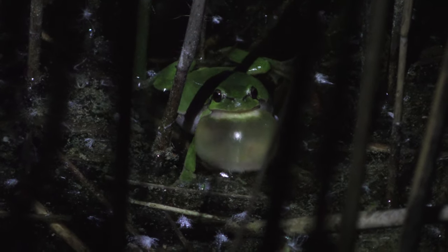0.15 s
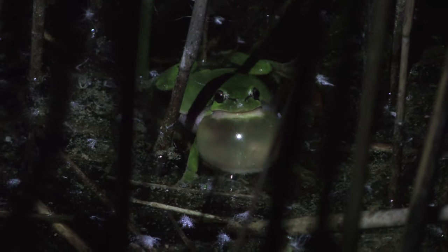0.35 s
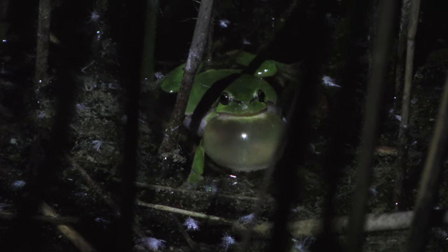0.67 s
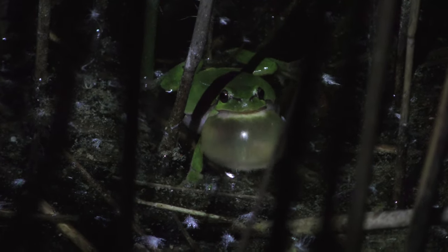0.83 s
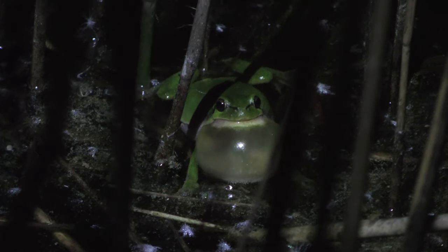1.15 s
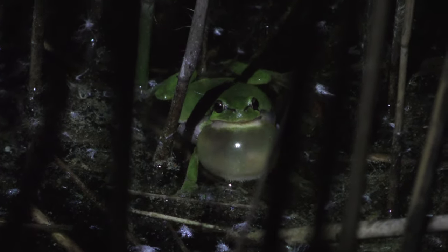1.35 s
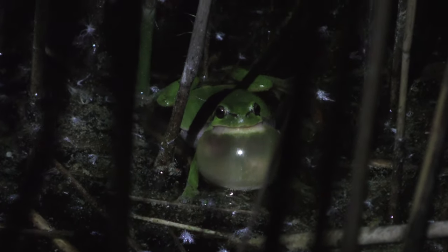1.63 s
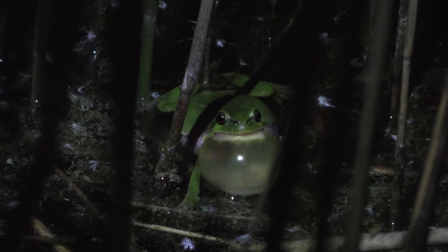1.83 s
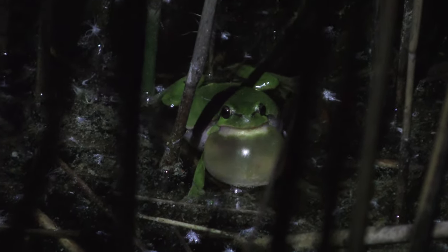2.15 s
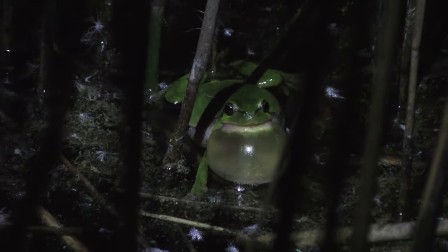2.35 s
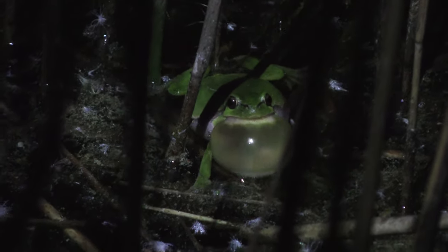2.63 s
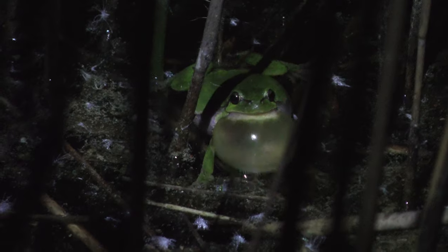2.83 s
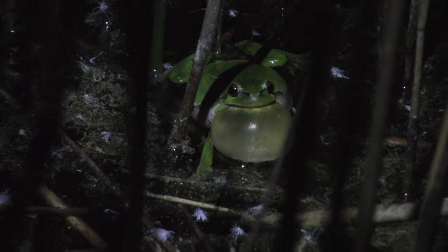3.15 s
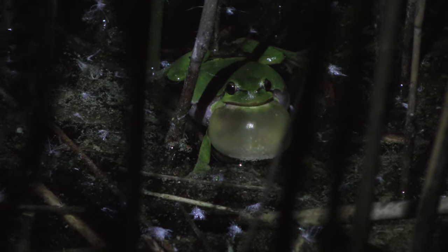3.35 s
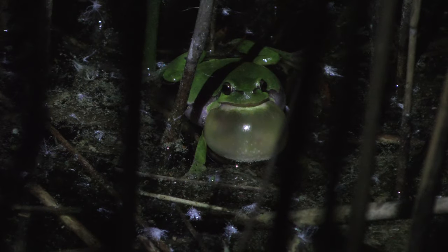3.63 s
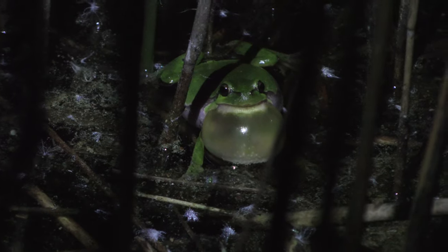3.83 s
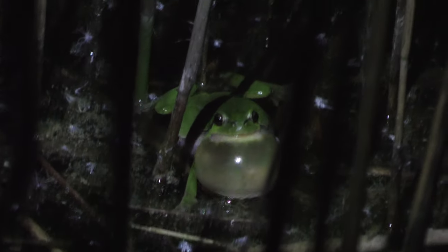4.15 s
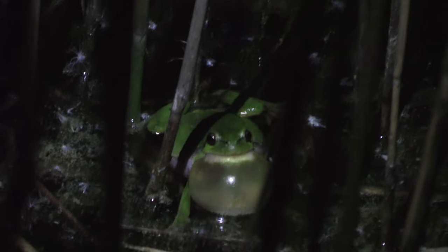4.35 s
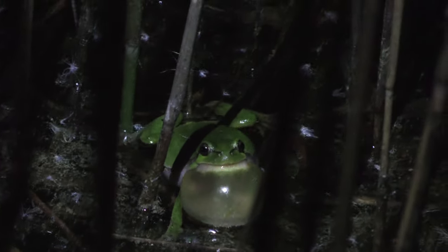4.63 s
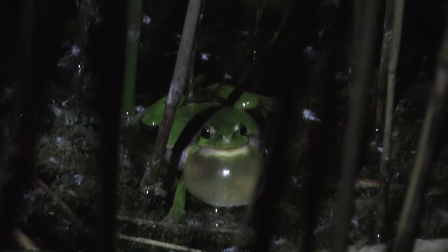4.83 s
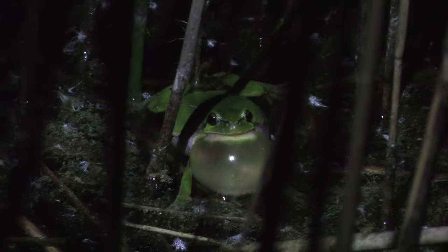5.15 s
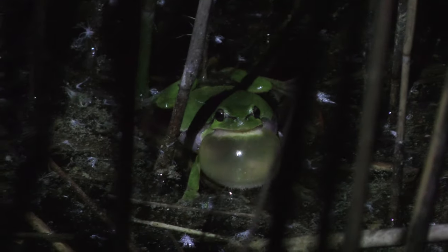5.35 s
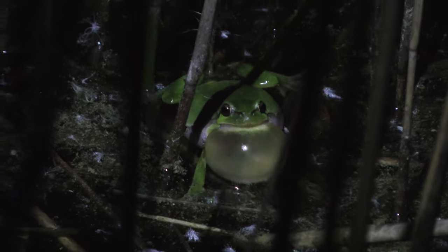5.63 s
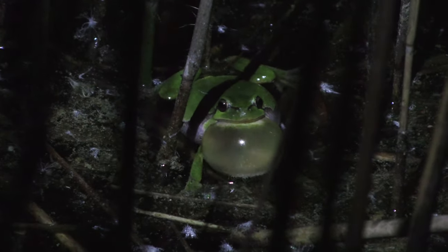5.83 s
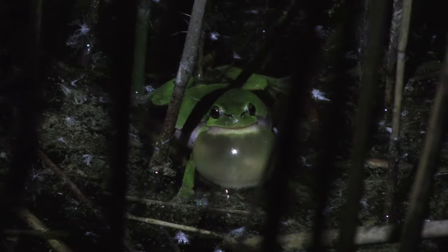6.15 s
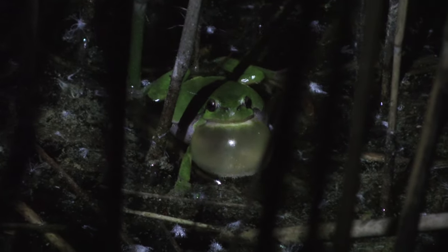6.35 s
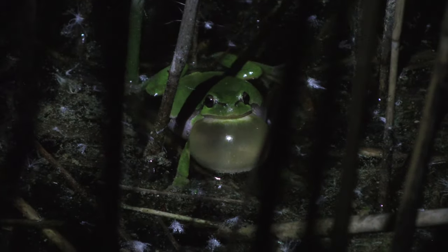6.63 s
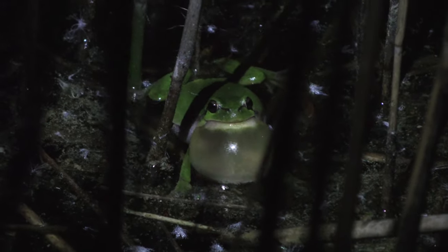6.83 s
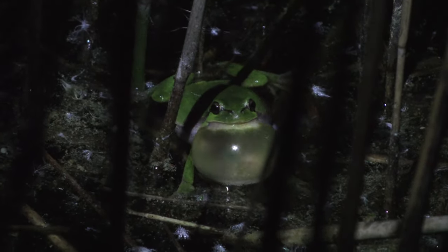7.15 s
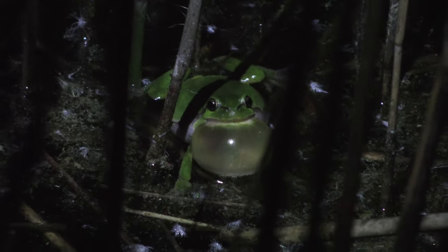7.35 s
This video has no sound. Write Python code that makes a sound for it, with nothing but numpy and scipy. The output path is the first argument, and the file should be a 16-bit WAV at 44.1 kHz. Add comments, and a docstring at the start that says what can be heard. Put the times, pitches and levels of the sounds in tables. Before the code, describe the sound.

A tree frog close to the microphone, toward the left, gives loud, short rasping calls, each a brief buzz on nearly the same high pitch. It starts at about seven calls a second, easing to five after 1.5 seconds. From about 1.2 seconds a slightly lower, softer neighbour calls in the gaps. The close frog rests from 2.8 to 3.9 seconds while the neighbour continues. It returns at about four calls a second, then runs fast and even again from 5.3 seconds to the end at 7.5. The neighbour stops around 5.7 seconds, and a faint, higher frog adds a quickening run until about 7. Throughout, softer frogs answer or call at random, and a dull, distant chorus carries on, lightly scattered by the reeds. Beneath lie very quiet night air and a barely audible low hum that slowly swells.

```python
"""Frogs among reeds at night

A close frog gives short rasping calls, up to about seven a second. A neighbour calls in between,
softer frogs answer or call at random, and a chorus carries on far off, over air and a faint hum.
Each call is a run of pulses: brief buzzes of the vocal cords that ring the throat sac and body."""
import sys
import numpy as np
from scipy import signal
from scipy.fft import rfft, irfft
from scipy.io import wavfile
from scipy.ndimage import map_coordinates

SR = 44100
rng = np.random.default_rng(int(sys.argv[2]) if len(sys.argv) > 2 else 0)


def put_to_file(sound):
    """Save the sound as 16-bit audio at rate SR, in the file named by the first command-line argument."""
    columns = np.atleast_2d(sound).T  # one column per channel
    safe = np.clip(columns, -1, 1)
    whole_steps = np.round(safe * 32767)
    wavfile.write(sys.argv[1], SR, whole_steps.astype(np.int16))


N = 329848

# calls of the near frog: centre_s, length_factor
NEAR_CALLS = [(0.0809, 1.2), (0.2191, 0.99), (0.3574, 0.99), (0.496, 1), (0.6338, 1.14), (0.7734, 1.19),
              (0.902, 1.02), (1.0505, 1.14), (1.1888, 1.18), (1.3375, 1), (1.4721, 1.22), (1.6463, 0.97),
              (1.8236, 0.99), (2.0266, 1.19), (2.2396, 1.2), (2.4294, 0.88), (2.6202, 1.03), (2.8165, 1.04),
              (3.9329, .94), (4.168, 0.99), (4.4355, 1.16), (4.6864, 1.13), (4.9608, 1.05), (5.148, 1.12),
              (5.3351, 1.22), (5.4694, 0.9), (5.6112, 1), (5.7903, 1.12), (5.9993, 1.17), (6.1499, 0.93),
              (6.2961, 0.91), (6.4401, 1.09), (6.5882, 0.95), (6.7322, 0.94), (6.8803, 1), (7.0298, 1.11),
              (7.1643, 0.9), (7.308, 0.98), (7.4477, 0.88)]
NEAR_SAC_HZ, PITCH_SCATTER = 2131.8, 0.0024


def from_db(db):
    """Decibels to gain."""
    return 10 ** (np.asarray(db) / 20)


def rms_one(x):
    """Scale to rms 1."""
    return x / np.sqrt(np.mean(x ** 2) + 1e-20)


def shaped_noise(spectrum):
    """Noise of rms 1 from rows of freq_hz, density_db."""
    hz, db = np.transpose(spectrum)
    bins_hz = np.maximum(np.fft.rfftfreq(N, 1 / SR), 1)
    gain = from_db(np.interp(np.log(bins_hz), np.log(hz), db))
    return rms_one(irfft(rfft(rng.standard_normal(N)) * gain, N))


def resonate(x, hz, width_hz):
    """One resonance, peak gain 1."""
    r = np.exp(-np.pi * width_hz / SR)
    feedback = [1, -2 * r * np.cos(2 * np.pi * hz / SR), r * r]
    return signal.lfilter(np.array([1, 0, -1]) * (1 - r * r) / 2, feedback, x)


def butter(x, hz, kind, order):
    """Causal high- or low-pass."""
    return signal.sosfilt(signal.butter(order, hz, kind, fs=SR, output="sos"), x)


def near_frog(pulse_hz=131):
    """The close caller: nearly the same pitch in every call."""
    # loudness curve: time_s, level_db
    loudness = [(0.4, -21), (2.1, -21.5), (4.0, -19.5), (5.7, -20), (7.4, -20.5)]
    calls = []
    for s, length in NEAR_CALLS:
        sac_hz = NEAR_SAC_HZ * (1 + PITCH_SCATTER * rng.standard_normal())
        calls.append((s, np.interp(s, *np.transpose(loudness)), sac_hz, pulse_hz, length))
    return frog_calls(calls, rasp_db=-16.5)


def frog_calls(calls, rasp_db, size=8192):
    """A run of calls from rows of centre_s, level_db, sac_hz, pulse_hz, length_factor."""
    # air rushing through the cords: freq_hz, density_db
    rasp_spectrum = [(700, 5), (1400, 9), (2800, 8.5), (3800, 3), (5000, -3.5), (6800, -7), (7600, -15.5),
                     (8700, -13.5), (9700, -24.5), (13000, -25)]
    rasp = from_db(rasp_db) * shaped_noise(rasp_spectrum)
    t = (np.arange(size) - size // 2) / SR
    out = np.zeros(N + 2 * size)
    for s, db, sac_hz, pulse_hz, length in calls:
        i, j = int(np.clip(s * SR, 0, N)) + size // 2, rng.integers(N - size)
        cords = vocal_cords(t, rasp[j:j + size], sac_hz, pulse_hz, length)
        voice = sac_and_body(cords, sac_hz)
        centre_rms = np.sqrt(np.mean(voice[np.abs(t) < 2 / pulse_hz] ** 2))
        out[i:i + size] += from_db(db) * voice / centre_rms
    # so small an animal radiates no bass
    return butter(out[size:size + N], hz=750, kind="high", order=8)


def call_course(t, attack_s=.03, half_hold_s=.011, release_s=.02, rise_per_s=.8, slack=.055,
                quicken_per_s=2.8, rasp_fall_db_per_s=150.5, edge_glide_s=.038):
    """A call of length 1 about t = 0: pulses quicken; cords tighten, then slacken as effort drops."""
    corners_s = [-half_hold_s - attack_s, -half_hold_s, half_hold_s, half_hold_s + release_s]
    t = np.clip(t, corners_s[0], corners_s[-1])
    effort = np.interp(t, corners_s, [0, 1, 1, 0])
    pitch_factor = 1.028 + rise_per_s * t - slack * (1 - effort)
    edge_hz = 7900 - 1000 * np.exp(-t / edge_glide_s)
    return effort, pitch_factor, np.exp(quicken_per_s * t), -rasp_fall_db_per_s * t, edge_hz


def vocal_cords(t, rasp, sac_hz, pulse_hz, length, open_s=.0062, rise_s=.0012, lead_s=.0037,
                jitter_s=.0004, sag=.023, wobble=.014, uneven_db=1.06, edge_db=-31.5, count=18):
    """Pulses of one call: the cords snap open, then close more slowly while their pitch sags."""
    # cord partials 1 to 6: level_db
    partials_db = [-4.5, -1, -17.5, -34.5, -36, -38]
    partials = np.arange(len(partials_db))[:, None] + 1
    effort, pitch_factor, rate_factor, rasp_db, edge_hz = call_course(t / length)
    centre = len(t) // 2
    # as the cords tighten, the rasp climbs and a bright overtone, the edge, sweeps up along its top
    rasp_speed = (edge_hz / edge_hz[centre]) ** 1.15
    rasp = map_coordinates(rasp, [np.cumsum(rasp_speed)], order=3, mode="mirror")
    edge_cycles = np.cumsum(edge_hz) / SR
    pulse_cycles = np.cumsum(pulse_hz * rate_factor) / SR
    starts_s = np.interp(np.arange(count) - count // 2, pulse_cycles - pulse_cycles[centre], t)
    age_s = np.arange(int(open_s * SR) + 1) / SR
    closing = np.cos(np.pi / 2 * np.minimum(age_s / open_s, 1))
    opening = (1 - np.exp(-age_s / rise_s)) * closing
    sagged_s = np.cumsum(1 + sag * (1 - 2 * age_s / open_s)) / SR
    cords = np.zeros(len(t))
    for start_s, (late, strong, phase, sharp) in zip(starts_s, rng.standard_normal((count, 4))):
        push = np.interp(start_s, t, effort)
        if push > 0:
            onset = np.searchsorted(t, start_s - lead_s + jitter_s * late)
            i = int(np.clip(onset, 0, len(t) - len(age_s)))
            pulse = slice(i, i + len(age_s))
            # partial 2 glides up through the sac resonance
            cord_hz = sac_hz / 2 * (pitch_factor[i] + wobble * sharp)
            buzz = from_db(partials_db) @ np.sin(2 * np.pi * partials * (cord_hz * sagged_s + phase))
            edge = np.sin(2 * np.pi * ((1 + .02 * sharp) * edge_cycles[pulse] + phase))
            harsh = from_db(rasp_db[i]) * (rasp[pulse] + from_db(edge_db) * edge) * closing
            cords[pulse] += push * from_db(uneven_db * strong) * opening * (buzz + harsh)
    return cords


def sac_and_body(cords, sac_hz):
    """The throat sac rings; head and body radiate in opposite phase, lower in a deeper-voiced frog."""
    # head and body resonances of the near frog: freq_hz, width_hz, gain_db
    modes = [(885, 130, -1.5), (1320, 320, -4.5), (2850, 400, -9), (3500, 240, -6), (4200, 900, -14.5),
             (5400, 1000, -12), (6900, 1400, -12)]
    body = sum(from_db(db) * resonate(cords, hz * sac_hz / NEAR_SAC_HZ, width_hz)
               for hz, width_hz, db in modes)
    return from_db(0.5) * resonate(cords, sac_hz, width_hz=215) - body


def neighbour_frog(sac_hz=2016, pulse_hz=133):
    """A slightly lower voice calls in between."""
    # neighbour's calls: centre_s, level_db, length_factor
    replies = [(1.151, -26.5, 0.96), (1.435, -27.5, 1.13), (1.7323, -26, 1.39), (1.928, -25, 1.01),
               (2.1233, -26, 1.67), (2.3225, -25.5, 1.13), (2.5095, -25.5, 1.32), (2.7148, -26.5, 1.05),
               (2.922, -25, 1.44), (3.1743, -26.5, 1.43), (3.37, -25, 1.17), (3.5588, -25, 1.19),
               (3.6943, -26, 1.03), (3.816, -26, 1.48), (4.0724, -25, 1.35), (4.207, -25.5, 0.99),
               (4.333, -25, 1), (4.463, -28.5, 1.06), (4.5963, -26, 1.2), (4.726, -27, 1.16),
               (4.8584, -27, 1.58), (4.993, -26.5, 1.16), (5.51, -26, 1.03), (5.6925, -25.5, 1)]
    calls = [(s, db, sac_hz * (1 + PITCH_SCATTER * rng.standard_normal()), pulse_hz, length)
             for s, db, length in replies]
    return frog_calls(calls, rasp_db=-15.5)


def far_frogs(pulse_hz=135, length=1.3):
    """Single voices that stand out of the chorus."""
    # clearest far calls: centre_s, level_db, sac_hz
    clear_calls = [(0.019, -39, 2025), (0.288, -34.5, 2020), (0.396, -38, 1920), (0.6, -41.5, 1910),
                   (0.665, -36.5, 1993), (1.021, -37, 2225), (1.259, -38, 2090), (1.566, -38.5, 1995),
                   (1.851, -35, 2005), (2.356, -37, 1954), (2.75, -30, 2028), (3.039, -37.5, 2047),
                   (3.091, -32.5, 2020), (3.231, -34.5, 2090), (3.282, -36, 1940), (3.424, -33.5, 1970),
                   (3.642, -39, 2050), (4.248, -35, 1923), (4.384, -39.5, 2200), (4.535, -34, 2030),
                   (4.79, -34.5, 2060), (5.041, -39, 2100), (5.107, -31, 1944), (5.241, -31.5, 1946),
                   (5.377, -32, 1957), (5.647, -32, 1990), (5.915, -33.5, 2010), (6.055, -35.5, 1964)]
    calls = [(s, db, hz, pulse_hz * rng.uniform(.93, 1.07), length)
             for s, db, hz in clear_calls + high_bout() + soft_calls()]
    return frog_calls(calls, rasp_db=-16)


def high_bout(start_s=5.839, first_gap_s=.19, gap_shrink=.07, level_db=-36.5, sac_hz=2320, count=8):
    """A small, high-voiced frog's quickening run. Rows: centre_s, level_db, sac_hz."""
    gaps_s = first_gap_s * (1 - gap_shrink) ** np.arange(count)
    return [(s, level_db, sac_hz) for s in start_s + np.cumsum(gaps_s) - gaps_s]


def soft_calls(delay_s=.068, answer_db=-37, answer_hz=2000, stray_db=-36, stray_hz=2060,
               spread_s=.008, spread_db=1.9, spread_hz=65, pause_s=.046, count=60):
    """One frog answers the near one, others call at random. Rows: centre_s, level_db, sac_hz."""
    # pauses shared by these frogs: centre_s
    lulls_s = [0.445, 0.555, 0.715, 1.29, 2.185, 2.565, 2.86, 2.98, 3.745, 3.875, 5.275, 5.415, 5.73]
    answers = [(s + rng.normal(delay_s, spread_s), answer_db, answer_hz) for s, _ in NEAR_CALLS]
    strays = [((k + rng.random()) / count * N / SR, stray_db, stray_hz) for k in range(count)]
    calls = [(s, rng.normal(db, spread_db), rng.normal(hz, spread_hz)) for s, db, hz in answers + strays]
    return [(s, db, hz) for s, db, hz in calls if np.abs(s - np.array(lulls_s)).min() > pause_s]


def chorus(level_db=-48, low_hz=1900, span_hz=300, pulse_hz=135, length=1.7, count=90):
    """Many distant frogs call at random."""
    calls = [((k + late) / count * N / SR, level_db - 6 * soft, low_hz + span_hz * high, pulse_hz, length)
             for k, (late, soft, high) in enumerate(rng.random((count, 3)))]
    return frog_calls(calls, rasp_db=-15)


def over_ground(x):
    """The low part of a call carries best over distance."""
    return x + from_db(-4) * resonate(x, hz=810, width_hz=120)


def reeds(x, wet_db, t60_s=.06, treble_db=13, stem_hz=4500, size=12000):
    """Stems and water scatter a short stereo tail; thin stems throw back mostly treble."""
    age_s = np.arange(size) / SR
    echoes = rng.standard_normal((2, size)) * from_db(-60 * age_s / t60_s) * (age_s > .001)
    echoes /= np.sqrt(np.sum(echoes ** 2, axis=1, keepdims=True))
    echoes += from_db(treble_db) * butter(echoes, hz=stem_hz, kind="high", order=3)
    return x + from_db(wet_db) * signal.fftconvolve(x[None], echoes, axes=1)[:, :N]


def night_air(level_db=-62.5, side_db=-9):
    """Soft noise of still air, partly different at each side."""
    # air spectrum: freq_hz, density_db
    spectrum = [(25, -2.5), (60, -4), (140, -2), (220, -4.5), (290, -7), (380, -1), (650, 0), (1500, -6),
                (4000, -20), (8300, -25.5), (10000, -40), (14000, -43)]
    middle = shaped_noise(spectrum)
    sides = np.array([shaped_noise(spectrum), shaped_noise(spectrum)])
    return from_db(level_db) * (middle + from_db(side_db) * sides)


def distant_hum(waver_hz=11):
    """Three low tones waver and slowly swell."""
    # hum tones: pitch_hz, level_db
    tones = [(132, -73.5), (242, -75.5), (366, -73)]
    # hum swell: time_s, gain_db
    swell = [(0, -15.5), (3.0, -9.5), (6.0, -4), (6.9, -1), (7.5, 3)]
    t = np.arange(N) / SR
    hum = np.zeros(N)
    for hz, db in tones:
        drift_hz = waver_hz * rms_one(butter(rng.standard_normal(N), hz=24, kind="low", order=2))
        hum += from_db(db) * np.sqrt(2) * np.sin(2 * np.pi * (hz * t + np.cumsum(drift_hz) / SR))
    return hum * from_db(np.interp(t, *np.transpose(swell)))


def scene():
    """Distant frogs arrive more scattered by the reeds; the near one sits a little to the left."""
    near = from_db([[0.8], [-0.8]]) * reeds(near_frog(), wet_db=-15.5)
    neighbour = from_db([[0.6], [0.4]]) * reeds(over_ground(neighbour_frog()), wet_db=-12)
    far = from_db(1.13) * reeds(over_ground(far_frogs()), wet_db=-12)
    dull_chorus = butter(over_ground(chorus()), hz=3120, kind="low", order=3)
    distant = reeds(dull_chorus, wet_db=-0.5, t60_s=0.25)
    return near + neighbour + far + distant + night_air() + distant_hum()


def record(dry, left_over_right_db=9.5, stopband_hz=13900):
    """Left channel much stronger, right a little fuller in the mids; the top is cut."""
    left, right = dry
    right = right + from_db(-11) * resonate(right, hz=1300, width_hz=500)
    balance = from_db([[left_over_right_db], [0]])
    top_cut = signal.cheby2(12, 70, stopband_hz, fs=SR, output="sos")
    return signal.sosfilt(top_cut, np.array([left, right]) * balance / balance.mean())


dry = scene()
out = record(dry)
put_to_file(out)
```